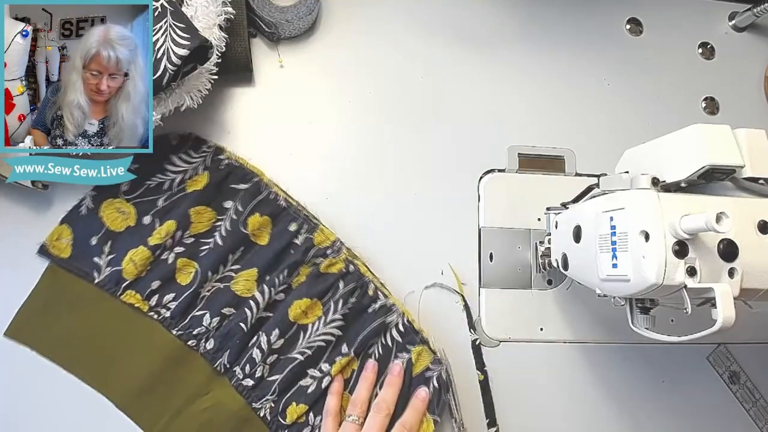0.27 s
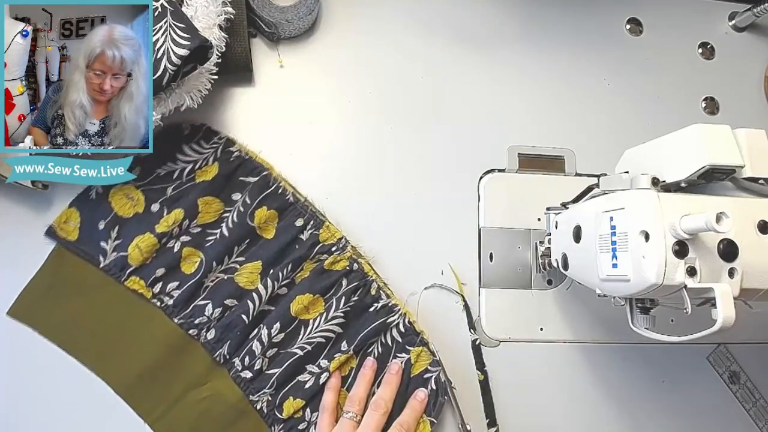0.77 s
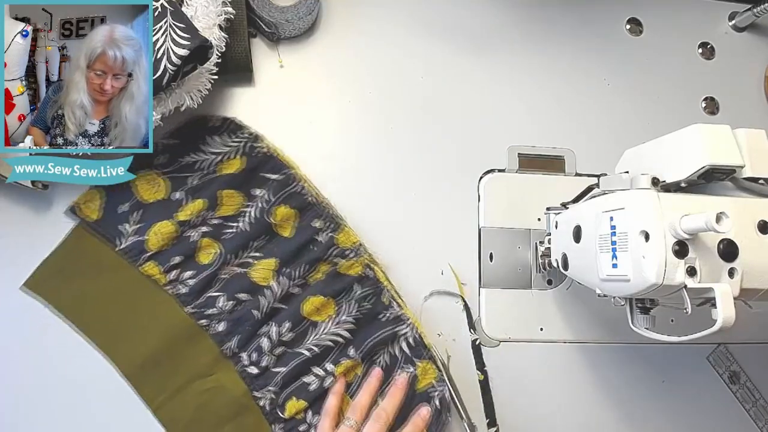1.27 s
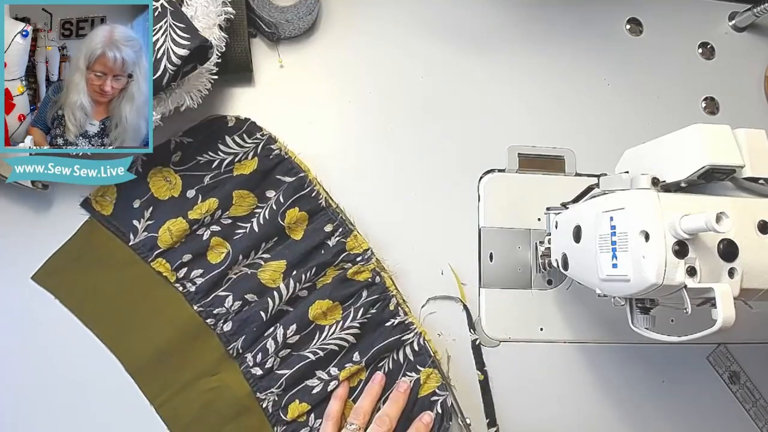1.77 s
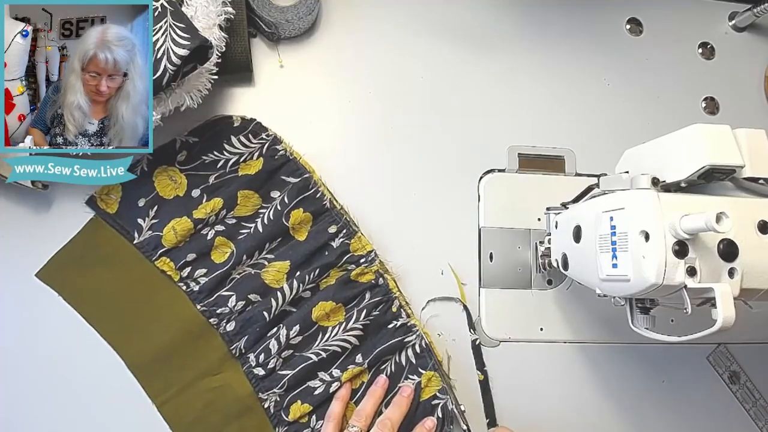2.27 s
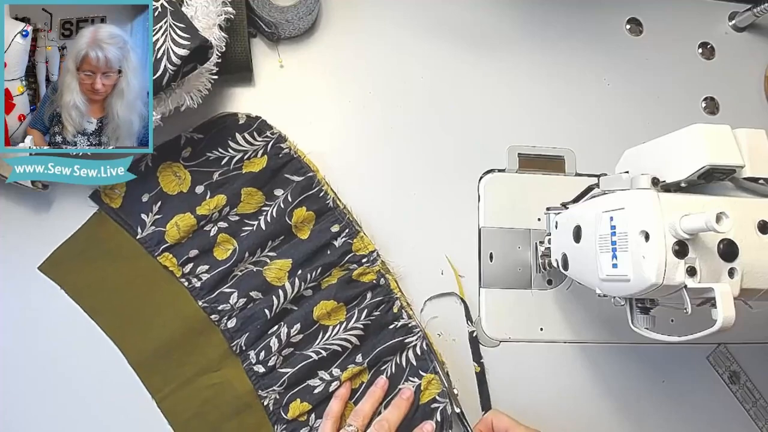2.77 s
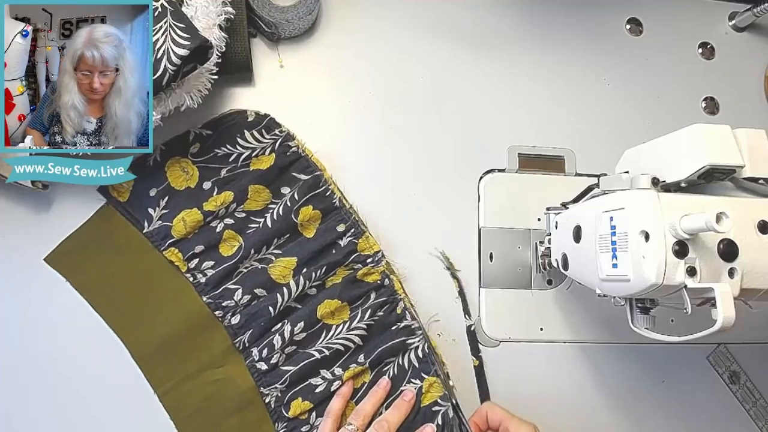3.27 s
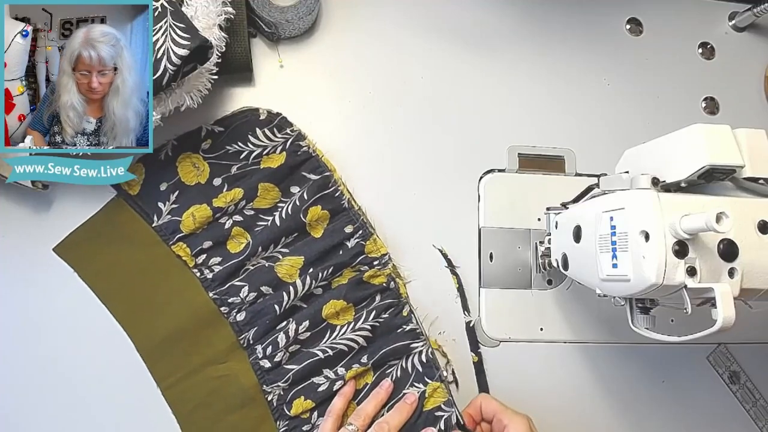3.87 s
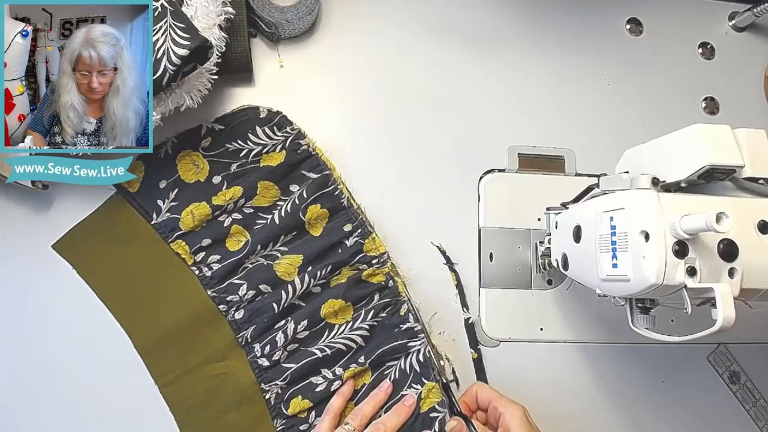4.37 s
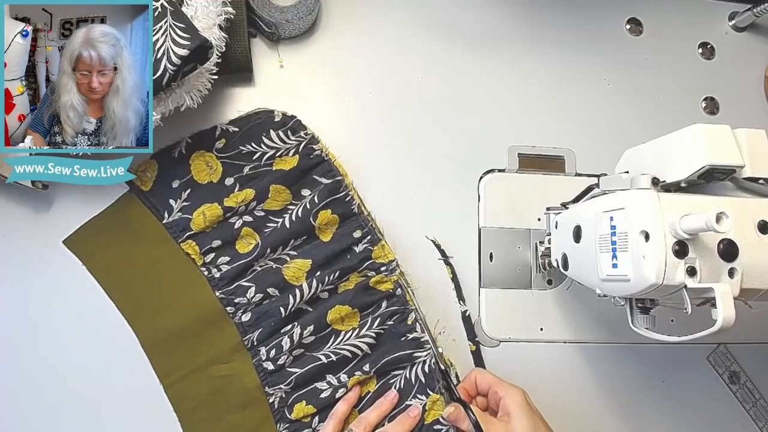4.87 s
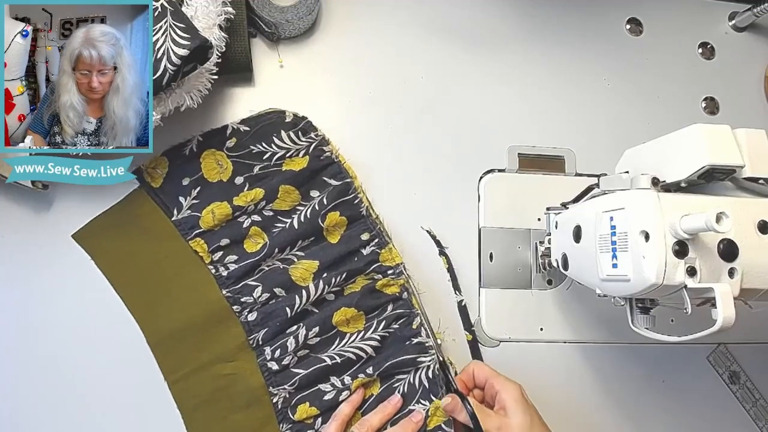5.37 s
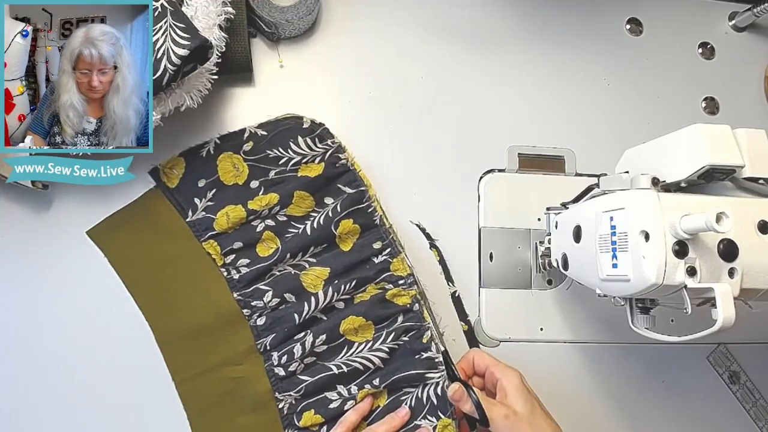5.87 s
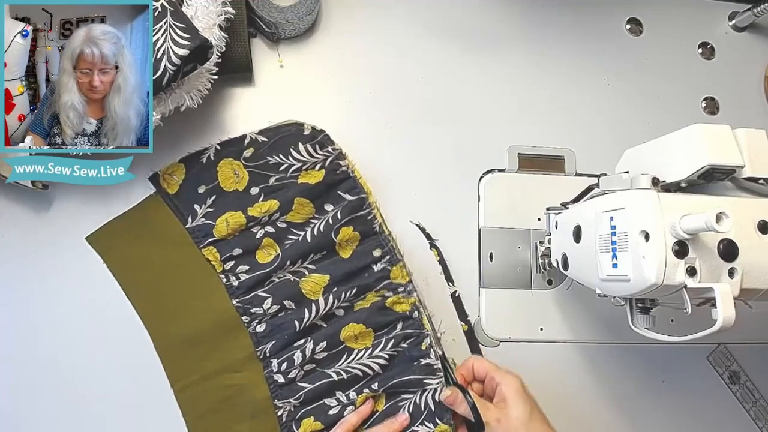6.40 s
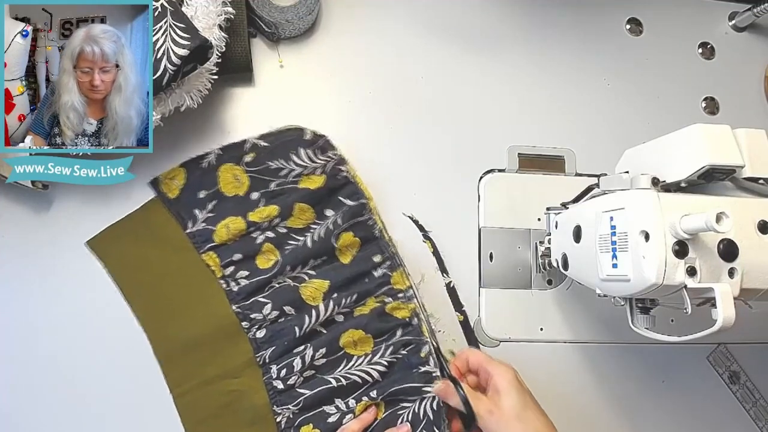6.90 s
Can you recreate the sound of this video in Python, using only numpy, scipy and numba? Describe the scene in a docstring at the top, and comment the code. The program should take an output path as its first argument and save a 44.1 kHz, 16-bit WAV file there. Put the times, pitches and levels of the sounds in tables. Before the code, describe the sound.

Close in a small quiet room, with low hiss and a faint wavering motor hum throughout. At 0-0.35 s cloth slides softly over a table. From 0.5 s scissors begin gritty, delicate nibbling, with tiny bright ticks from 0.7 s and a sharp steel clack at 1.05 s, then a duller knock at 1.2 s. Fine crunching runs 1.55-1.9 s. Cloth rubs at 2 s; clustered clicks follow at 2.3 s, then more sliding with two thin, brief whistles near 2.5 s. A firm knock lands at 2.83 s. Snips at 3.2-3.4 s set off a light metallic ping. Slides alternate with clicks at 3.87 and 4.14 s, a busy cluster at 4.3-4.6 s, and a solid woody knock at 5.03 s. Crisp snips come at 5.4-5.6 s, quieter rustling follows, then small cuts at 6.1-6.3 s, knocks at 6.7-6.85 s, a last slide and a closing snip around 7.1 s.

```python
"""Scissors through gathered cloth

Steel scissors nibble through layers of gathered cloth on a work table in a small quiet room, heard close by.
Threads part in gritty stick-slip bursts that ring modes of blades, handles and table top; knocks fall among them.
Cloth slides as swells of soft hiss and dull rub; a thin metal part pings and a faint whistle sounds twice, both as tones.
A short noise tail echoes off the walls, over a wavering motor hum and room hiss."""
import sys
import numpy as np
from scipy import signal
from scipy.fft import rfft, irfft, next_fast_len
from scipy.io import wavfile
from scipy.ndimage import uniform_filter1d, minimum_filter1d
from numba import njit

SR = 44100
rng = np.random.default_rng(int(sys.argv[2]) if len(sys.argv) > 2 else 0)


def to_wav(s):
    """Save 16-bit WAV."""
    ch = np.atleast_2d(s).T  # columns
    pcm = np.round(np.clip(ch, -1, 1) * 32767)  # PCM
    wavfile.write(sys.argv[1], SR, pcm.astype(np.int16))


def magnitude_from_level(level_db):
    """Linear magnitude for a level in decibels (20 dB per decade)."""
    exponent = np.asarray(level_db, float) / 20
    return 10 ** exponent


N = 314874  # samples in the scene
STEP = 64  # samples between renewals of the ringing modes

# Knocks and thread snaps. Each row: time in seconds, drive of the blades, the table and the handles in dB,
# brightness in dB per octave (held within 9 either way when used).
SNAPS = [(0.7333, -31, -72.5, -47, 20), (0.8206, -42, -73, -53, 20), (0.8733, -38, -69, -62, -15),
         (0.9134, -42, -81, -52, -18), (0.9767, -35.5, -57.5, -65, 0), (1.0092, -33, -70, -61, 19),
         (1.0414, -28.5, -59.5, -50, 10), (1.0535, -5.5, -39.5, -32.5, 8.5), (1.1643, -30, -65, -70, 12),
         (1.219, -17, -32.5, -27, 2.5), (1.429, -72.5, -37.5, -41, -3), (1.6447, -40.5, -64, -39.5, 4),
         (1.6621, -38, -59.5, -39, 0), (1.712, -35, -59.5, -41, 0.1), (1.7256, -45, -54.5, -36.5, 9),
         (1.7438, -35, -55, -50, 3), (1.7613, -35, -48, -59, 8), (1.7877, -35, -53, -42, 2),
         (1.8262, -31, -43, -33.5, -2), (1.8619, -36, -51.5, -36.5, -1.5), (2.0115, -45, -53, -53, -3),
         (2.2327, -38.5, -54.5, -46, -2), (2.315, -29.5, -40.5, -38, 4), (2.3241, -21.5, -26, -23.5, -4.5),
         (2.3464, -38, -38, -54, 6), (2.3654, -29.5, -35, -30.5, 0), (2.7297, -39, -58.5, -42.5, 2),
         (2.7702, -39, -52.5, -54.5, -3), (2.8217, -29.5, -36, -53, 12), (2.829, -21.5, -22.5, -21.5, 2),
         (3.0424, -44, -52, -69, 3.5), (3.2723, -32.5, -42.5, -52, -4), (3.2776, -32.5, -42.5, -29.5, -2),
         (3.3047, -33.5, -40.5, -33, -2), (3.382, -38, -44, -50, -3), (3.387, -25, -35.5, -20.5, -6.2),
         (3.5404, -45.5, -54.5, -60, 1), (3.7344, -47.5, -69, -44.5, -7), (3.7808, -38.5, -54, -58, -8),
         (3.8492, -35, -42, -44, -4), (3.8714, -23.5, -29, -25, -6), (4.143, -23.5, -44.5, -31.5, 1.3),
         (4.3353, -51, -56.5, -40, 6), (4.374, -43, -69, -47, -11), (4.4154, -35, -55, -40, -1),
         (4.4438, -43, -54, -36, 3), (4.475, -34, -40.5, -26, 9), (4.5158, -30, -46.5, -39, -12),
         (4.5262, -40, -39.5, -52, -17), (4.5439, -42, -50, -55, -15), (4.5677, -26, -35, -26.5, -11),
         (4.5895, -34, -51.5, -34, 1), (4.9333, -38, -64.5, -38, -10), (4.9584, -36.5, -51, -34, 5),
         (5.019, -26.5, -33, -36, -7), (5.0275, -30.5, -22, -17, 3), (5.2009, -45.5, -61.5, -68, -3.5),
         (5.3494, -68.5, -47, -54, 1), (5.4476, -25.5, -52, -38, -1.5), (5.4938, -38, -53, -53, -24),
         (5.5253, -37.5, -63.5, -48, -17), (5.5435, -33.5, -59, -49, -6), (5.5618, -31.5, -49.5, -53.5, 3),
         (5.591, -42, -66, -68, 3), (6.131, -31, -57.5, -63, 2), (6.17, -40, -74, -52, 7),
         (6.205, -45, -69, -72, 7), (6.236, -39, -77, -64, 12), (6.2547, -34, -54.5, -44.5, 9),
         (6.3014, -37.5, -65.5, -51, -1), (6.4794, -55, -81, -76, -2), (6.6985, -45.5, -36, -35.5, 4),
         (6.7255, -33.5, -51.5, -37, -9), (6.7464, -29, -29, -24.5, 8), (6.7644, -34.5, -38.5, -33, -16),
         (6.8395, -32.5, -33.5, -32, -4), (7.116, -43, -54, -42, 1), (7.1294, -36.5, -50.5, -30, 2)]
# Ringing of the blades. Each row: pitch in Hz, share in dB, time to fall 60 dB in seconds (before lingering).
BLADES = [(2683, -8, 0.013), (2850, -10, 0.014), (3340, -9.5, 0.024), (4910, -2.5, 0.0082),
          (5344, 4, 0.012), (6070, 0, 0.0066), (7120, -1.5, 0.027), (7667, 3, 0.0042), (8190, -10, 0.044),
          (9870, -9.5, .014), (10280, -1, 0.022), (12270, -7.5, .014), (13500, -8.5, 0.0099),
          (15500, -9.5, 0.0098)]


def scissors():
    """Shearing and snaps drive the resonances of the blades, the handles and the table top."""
    # Each row: pitch in Hz, share in dB, time to fall 60 dB in seconds.
    table_modes = [(97, -20, 0.096), (174, -10.5, 0.1), (252.4, -9.5, 0.061), (290.4, 1, 0.11),
                   (404, -2, 0.058), (461, -1.5, 0.048), (550.3, 12.5, 0.038), (654.7, 3.5, 0.077),
                   (674.7, 5.5, 0.07), (725, 3.5, 0.12), (719, 1, 0.033), (950, -5, 0.12),
                   (990, -27.5, 0.075)]
    # Each row: pitch in Hz, share in dB, time to fall 60 dB in seconds.
    handle_modes = [(1150, 10.5, 0.016), (1520, 1, 0.021), (1695, 4, 0.027), (1798, 2, 0.028),
                    (2022, -1.5, 0.052), (2330, -7, 0.014)]
    on_blades, on_table, on_handles, shear_tilt, crossing = strokes()
    at, blade_hit_db, table_hit_db, handle_hit_db, bright = np.transpose(SNAPS)
    # a snap's brightness takes over 4 ms ahead of it
    latest = np.searchsorted(at, np.arange(N) / SR + 0.004) - 1
    snap_tilt = bright[np.maximum(latest, 0)]
    grit = threads(slip_db=4, grain_db=2.4)
    hits = snaps(blade_hit_db, span_ms=0.34, rise=1.3, blow=0.25)
    rasp = on_blades * grit

    # the louder of snap and rasp sets the brightness
    hit_power = uniform_filter1d(hits ** 2, size=128)
    both_power = uniform_filter1d(hits ** 2 + rasp ** 2, size=128)
    share = hit_power / (both_power + 1e-14)
    tilt = (share * snap_tilt + (1 - share) * shear_tilt)[::STEP]
    crossing = np.clip(crossing[::STEP] + 0.08 * walk(16, STEP), 0, 1)

    # a blow shakes every mode; a slide picks a few and lets them ring
    sliding = minimum_filter1d(1 - share[::STEP], size=15, origin=7)
    in_air = np.clip(1 - on_table / (on_blades + 1e-9), 0, 1)[::STEP]
    linger = 1.8 ** (in_air * sliding)  # up to 1.8 times longer in the air than in cloth
    colour_db = blade_colour(tilt, crossing, depth_db=6.0, bend_hz=573)
    # the free length of blade changes with the crossing, and the lower pitches most with it
    stretch = 1 + 0.8 * (crossing - 0.5) * 2500 / np.transpose(BLADES)[0][:, None]
    blades = ring(hits + rasp, BLADES, colour_db, wander_db=2 + 3 * sliding, drift=0.012,
                  stretch=stretch, linger=linger)

    knocks = settle(snaps(handle_hit_db, span_ms=0.34, rise=2.2, blow=0.13)) + on_handles * grit
    handles = ring(knocks, handle_modes, 0, wander_db=2.2, drift=0.008)
    thuds = settle(snaps(table_hit_db, span_ms=6.43, rise=1.166, blow=1.3)) + on_table * grit
    table = ring(thuds, table_modes, 0, wander_db=1.5, drift=0.01)
    return blades + handles + table


def strokes():
    """Gains for blades, table and handles through each bite, push and let-go, with brightness and crossing point."""
    # Each row: start in seconds, length in seconds, blades in dB at mid-stroke,
    # gain of pressure over the stroke in dB, table in dB relative to the blades.
    shears = [(0.469, 0.2, -64, -6, -22), (0.686, 0.16, -56.5, -13.5, -13), (0.895, 0.14, -56, 8, -26),
              (1.151, 0.053, -59, 1, -1.5), (1.557, 0.17, -59.5, 16, -0.5), (1.739, 0.13, -54.5, -5, 4),
              (2.181, 0.14, -59.5, 1, 0.5), (2.72, 0.087, -59, 7, 1.5), (3.2, 0.14, -63, -6, -2.5),
              (3.292, 0.12, -62, -7.5, 8), (3.725, 0.17, -61.5, 12, 1.5), (4.313, 0.16, -55.5, 12.5, -3),
              (4.475, 0.12, -57.5, -8, 7.5), (4.899, 0.15, -56, -6, 1.5), (5.365, 0.072, -58.5, -1, -1),
              (5.447, 0.11, -53.5, -8.5, -19), (5.699, 0.054, -66.5, 2, -6.5),
              (6.081, 0.177, -58, -5, -10.5), (6.239, 0.12, -61, -11, -25), (6.645, 0.11, -58.5, 14, -11),
              (6.724, 0.095, -60, -5, 9.5), (7.092, 0.064, -51.5, 5, 2.5)]
    bite_s, let_go_s = 0.02, 0.025
    t = np.arange(N) / SR
    gains, tilt, crossing = np.zeros((3, N)), np.zeros(N), np.zeros(N)
    for s, length, db, push_db, table_db in shears:
        on = slice(int(s * SR), int((s + length + let_go_s) * SR))
        onward = slice(int(s * SR), None)
        since = t[on] - s
        edge = np.clip(np.minimum(since / bite_s, (length - since) / let_go_s + 1), 0, 1) ** 2
        # the handles shake under the blades, more so the firmer the table is touched
        relative_db = np.array([0, table_db, table_db - 1])[:, None]
        gains[:, on] += edge * magnitude_from_level(db + push_db * (since / length - 0.5) + relative_db)
        # dB per octave: slightly brighter where the table is louder
        tilt[onward] = -3 + 0.06 * table_db
        # where the blades cross, as a share of their length, from start to end of the stroke
        crossing[onward] = np.interp(t[onward], [s, s + length], [0.62, 0.44])
    return *gains, tilt, crossing


def threads(slip_db, grain_db):
    """Fibres parting one by one: dense clicks of uneven size, in slips and stalls; rms 1."""
    level_db = grain_db * rng.exponential(size=N) + slip_db * walk(90)
    return unit(rng.standard_normal(N) * magnitude_from_level(level_db))


def snaps(levels_db, span_ms, rise, blow):
    """Each contact is a gritty burst that swells and dies, with one firm blow at its height; energy as over span_ms."""
    size = 2048
    out = np.zeros(N + size)
    t_ms = np.arange(1, size + 1) / SR * 1000
    noise = rng.standard_normal((len(SNAPS), size))
    for (s, blade_db, table_db, *_), db, grains in zip(SNAPS, levels_db, noise):
        # longer when the table cushions it; above -14 dB steel meets bare steel, very briefly
        cushion = magnitude_from_level(0.12 * (table_db + 48.5))
        clack = magnitude_from_level(blade_db + 14) ** 2
        length_ms = 2.5 * cushion / (1 + clack)
        t = t_ms / np.clip(length_ms, 0.15, 12)
        shape = t ** rise * np.exp(-t)
        burst = grains * shape / np.sqrt(np.sum(shape ** 2))
        burst[np.argmax(shape)] = blow
        i = int((s - 0.0004 * length_ms) * SR)
        out[i:i + size] += magnitude_from_level(db) * burst * np.sqrt(span_ms * SR / 1000 / np.sum(burst ** 2))
    return out[:N]


def settle(knocks):
    """After each knock the scissors rock briefly on the table: a short rough tail."""
    settle_db, t60_s = -6, 0.14
    t = np.arange(SR // 4) / SR
    rock = rng.standard_normal(len(t)) * magnitude_from_level(-60 * t / t60_s) * np.minimum(t / 0.0031, 1)
    power = signal.fftconvolve(knocks ** 2, rock ** 2 / np.sum(rock ** 2))[:N]
    rough = np.sqrt(np.maximum(power, 0))
    return knocks + magnitude_from_level(settle_db) * rough * rng.standard_normal(N)


def blade_colour(tilt, crossing, depth_db, bend_hz):
    """A mode is strong when the blades cross at its belly, weak at its node; bending waves shorten as the root of pitch."""
    hz = np.transpose(BLADES)[0][:, None]
    shape = np.cos(2 * np.pi * crossing * np.sqrt(hz / bend_hz))
    return np.clip(tilt, -9, 9) * np.log2(hz / 1000) + depth_db * shape


def ring(drive, modes, colour_db, wander_db, drift, stretch=1, linger=1):
    """Decaying modes, each wandering in share and pitch under the hand; scaled for about the rms of a white drive."""
    hz, db, t60 = np.transpose(modes)[:, :, None]
    fade = np.exp(-np.log(1000) / (np.maximum(t60, 0.003) * linger * SR))
    wander = np.array([walk(28, STEP) for _ in modes])
    bend = np.array([walk(9, STEP) for _ in modes])
    gain = magnitude_from_level(db + wander_db * wander + colour_db)
    gain = gain / np.sqrt(np.sum(gain ** 2 / (1 - fade ** 2), axis=0) / 2)
    turn = fade * np.exp(2j * np.pi * hz * stretch * (1 + drift * bend) / SR)
    out = sum(mode(drive + 1e-18, g, p, STEP) for g, p in zip(gain, turn))
    # keep the sum of the modes within the range of their pitches
    edges = [0.62 * hz[0, 0], min(1.49 * hz[-1, 0], 0.45 * SR)]
    return signal.sosfilt(signal.butter(2, edges, "band", fs=SR, output="sos"), out)


@njit
def mode(push, gain, turn, step):
    """One decaying mode; its gain and its turn per sample are renewed every step."""
    out, z = np.empty(len(push)), 0j
    for i in range(len(push)):
        z = z * turn[i // step] + gain[i // step] * push[i]
        out[i] = z.real
    return out


def cloth():
    """A hiss of weave on weave and a dull rub through the table, swelling and fading with each slide, a little patchy."""
    # Cloth and hands sliding on the table. Each row: start in seconds, length in seconds,
    # hiss and dull rub in dB at the fastest moment, before the patchiness.
    slides = [(-.05, 0.23, -70.5, -64.5), (0.075, 0.26, -70.5, -60.5), (1.88, 0.11, -84, -65.5),
              (1.994, 0.28, -68.5, -65), (2.385, 0.14, -71, -57), (2.474, 0.32, -65.5, -59),
              (2.92, 0.1, -86, -64.5), (3.03, 0.29, -71.5, -60.5), (3.44, 0.061, -80.5, -70),
              (3.547, 0.2, -66.5, -59), (3.92, 0.095, -75, -62), (4.03, 0.26, -70.5, -66),
              (4.167, 0.15, -67, -67), (4.624, 0.032, -75, -57.5), (4.692, 0.2, -65.5, -58),
              (5.103, 0.16, -77, -62), (5.192, 0.24, -71.5, -65.5), (5.664, 0.21, -67.5, -66.5),
              (5.9, 0.28, -87, -73), (6.462, 0.26, -72.5, -76.5), (6.88, .08, -85, -68),
              (6.943, 0.21, -66.5, -60)]
    # Colour of the hiss. Each row: frequency in Hz, level in dB per Hz.
    weave_spectrum = [(1760, -30), (3000, -11), (3890, -16), (4500, -12.5), (4630, -10), (7150, -12.5),
                      (8880, -15), (16000, -29.5)]
    # Colour of the rub through the table. Each row: frequency in Hz, level in dB per Hz.
    rub_spectrum = [(120, -25), (250, 1.5), (600, 4.5), (1200, -8.5), (2200, -10.5), (4000, -42)]
    gather = 0.32  # share of a slide spent gathering speed
    t, hiss, rub = np.arange(N) / SR, 0, 0
    for s, length, hiss_db, rub_db in slides:
        speed = np.sin(np.pi / 2 * np.interp(t, [s, s + gather * length, s + length], [0, 1, 0]))
        hiss = hiss + magnitude_from_level(hiss_db) * speed ** 1.9
        rub = rub + magnitude_from_level(rub_db) * speed
    hiss = hiss * magnitude_from_level(4.4 * walk(36)) * coloured(weave_spectrum)
    rub = rub * magnitude_from_level(1.73 * walk(20)) * coloured(rub_spectrum)
    return hiss + rub


def pings():
    """A thin metal part set ringing now and then: one slightly rough decaying tone for each nudge."""
    # Each row: time in seconds, level in dB before the roughness.
    nudges = [(3.076, -63), (3.313, -48), (3.388, -38), (4.57, -46.5), (4.76, -57.5), (7.11, -49)]
    ping_hz, t60_s = 1889, 0.3
    out, t = np.zeros(N + SR), np.arange(SR // 2) / SR
    tone = np.sin(2 * np.pi * ping_hz * t) * magnitude_from_level(-60 * t / t60_s) * np.minimum(t / 0.0079, 1)
    for s, db in nudges:
        out[int(s * SR):][:len(t)] += magnitude_from_level(db) * tone
    return out[:N] * magnitude_from_level(1.5 * walk(120))


def whistle():
    """Two short, thin, unsteady near-sine notes that arch in pitch and fade."""
    # Each row: start in seconds, length in seconds, top of the arch in Hz, sag at the end in Hz,
    # level in dB before swell and flutter.
    notes = [(2.45, .125, 4770, 110, -70), (2.582, .098, 4440, 330, -68)]
    peak = 0.3  # share of a note before its highest pitch
    out, t = 0, np.arange(N) / SR
    for s, length, top_hz, sag_hz, db in notes:
        along = np.clip((t - s) / length, 0, 1)
        hz = top_hz - sag_hz * ((along - peak) / (1 - peak)) ** 2 + 25 * walk(80)
        swell = np.sqrt(2 * np.sin(np.pi * along) ** 2) ** 0.49
        out = out + swell * magnitude_from_level(db) * np.sin(2 * np.pi * np.cumsum(hz) / SR)
    return out * magnitude_from_level(4.0 * walk(60))


def narrow_dips(x):
    """Narrow dips in the treble colour the near sound."""
    # Each row: centre in Hz, width in Hz, share removed from 0 (none) to 1.
    dips = [(3930, 1400, 0), (6970, 350, 0.7), (9250, 310, 0.2), (11330, 370, 0.5), (12450, 500, 0.9)]
    for hz, width, share in dips:
        band = signal.lfilter(*signal.iirpeak(hz, hz / width, fs=SR), x)
        x = x - np.clip(share, 0, 1) * band
    return x


def walls(x):
    """Echo of the walls: a diffuse noise tail, fading at its own rate in each band, after the first reflection."""
    # Each row: band in Hz, time to fall 60 dB in seconds.
    echo_bands = [(250, 0.41), (700, 0.2), (2000, 0.26), (5000, 0.18), (12000, 0.077)]
    echo_db = -15.5
    t = np.arange(SR // 2) / SR
    onset = np.clip(t / 0.0057 - 0.5, 0, 1)
    tail = 0
    for hz, t60 in echo_bands:
        edges = [hz / 1.89, min(hz * 1.71, 0.45 * SR)]
        band = signal.butter(2, edges, "band", fs=SR, output="sos")
        noise = signal.sosfilt(band, rng.standard_normal(len(t)))
        tail = tail + noise * magnitude_from_level(-60 * t / t60) * onset
    return signal.fftconvolve(x, magnitude_from_level(echo_db) * tail / np.sqrt(np.sum(tail ** 2)))[:N]


def room():
    """Hiss that swells a little, and a wavering motor hum at twice the mains rate."""
    # Colour of the hiss. Each row: frequency in Hz, level in dB per Hz.
    room_spectrum = [(15, -47.5), (32, -17.5), (111, 0.5), (192, -12), (259, -5.5), (378, -11), (510, -8),
                     (766, -11.5), (1510, -19.5), (2400, -24), (3910, -28), (5270, -25.5), (8370, -31.5),
                     (15200, -35), (16500, -53)]
    hiss_db, hum_hz, hum_db = -62, 119.7, -67  # middle values, each wandering below
    phase = 2 * np.pi * np.cumsum(hum_hz * (1 + 0.022 * walk(6.8))) / SR
    hum = np.sqrt(2) * magnitude_from_level(hum_db + 1.2 * walk(9)) * np.sin(phase)
    hiss = magnitude_from_level(hiss_db + 0.5 * walk(2.88)) * coloured(room_spectrum)
    return hiss + hum


def unit(x):
    """Scale to rms 1."""
    return x / np.sqrt(np.mean(x ** 2))


def walk(rate, step=1):
    """Random levels, a new one every 1 / rate s, joined smoothly; one value per step samples, rms 1."""
    levels = rng.standard_normal(int(N / SR * rate) + 2)
    knots = uniform_filter1d(np.repeat(levels, 4), size=4)
    return unit(np.interp(np.arange(0, N, step) / SR * rate * 4, np.arange(len(knots)), knots))


def coloured(spectrum):
    """Steady noise with the given spectrum, rms 1."""
    hz, db = np.transpose(spectrum)
    size = next_fast_len(N)
    bins = np.arange(size // 2 + 1) * SR / size + 1
    colour = magnitude_from_level(np.interp(np.log(bins), np.log(hz), db))
    return unit(irfft(rfft(rng.standard_normal(size)) * colour, size)[:N])


def scene():
    """Scissors and cloth close by, their echo, and the room."""
    near = narrow_dips(scissors() + cloth()) + pings() + whistle()
    return (near + walls(near) + room())[None]


def band_limit(x):
    """A steep low-pass at the top of the band."""
    return signal.sosfilt(signal.butter(12, 16670, fs=SR, output="sos"), x)


def record(dry):
    """The sound loses its top above 15.9 kHz in a steep low-pass."""
    top_cut = signal.ellip(8, 0.2, 70, 15900, fs=SR, output="sos")
    mix = signal.sosfilt(top_cut, dry)
    return band_limit(mix)


dry = scene()
out = record(dry)
to_wav(out)
```